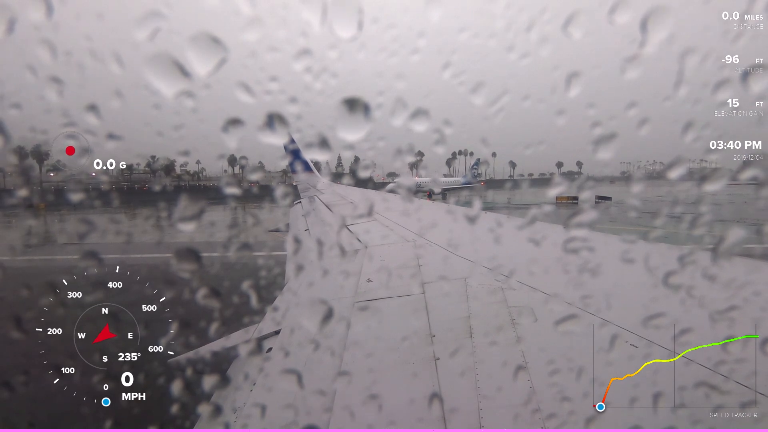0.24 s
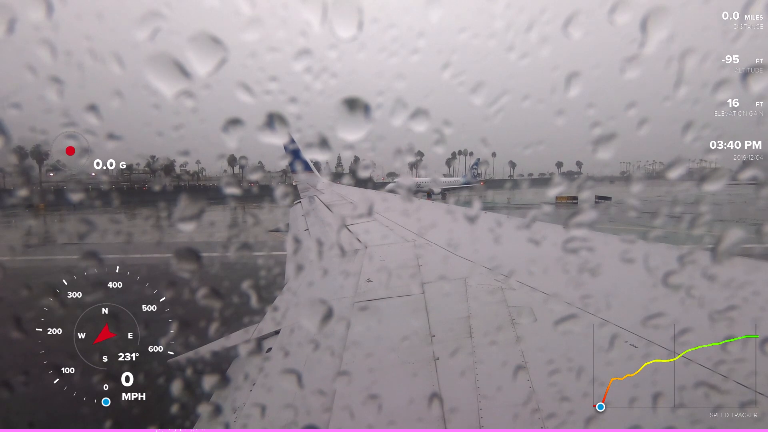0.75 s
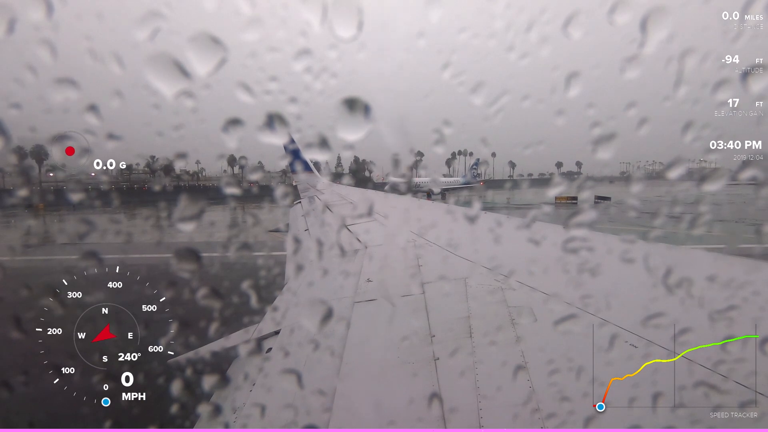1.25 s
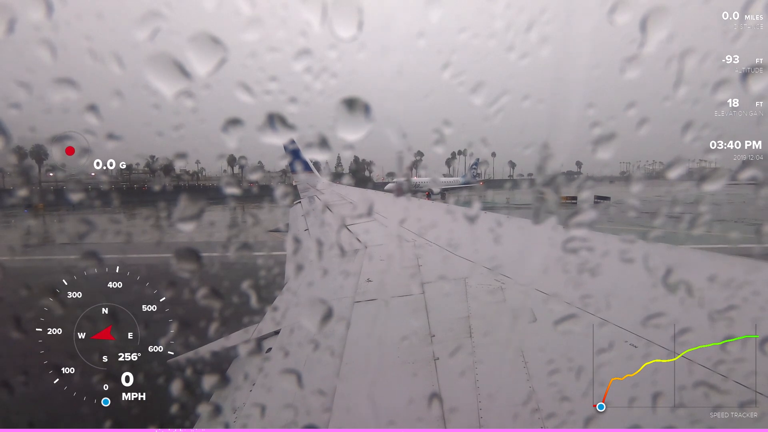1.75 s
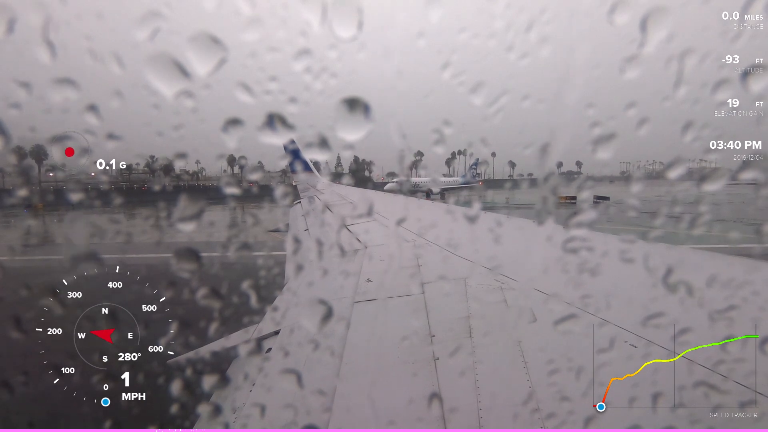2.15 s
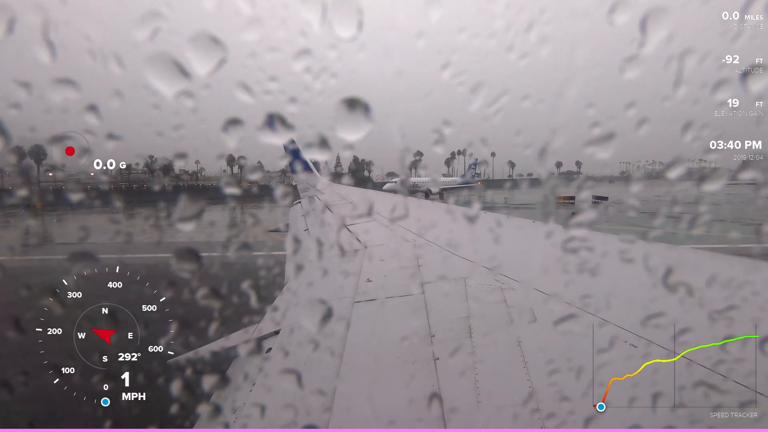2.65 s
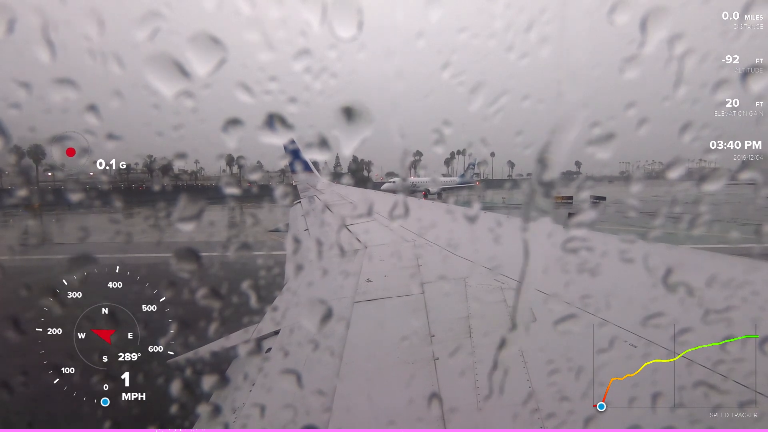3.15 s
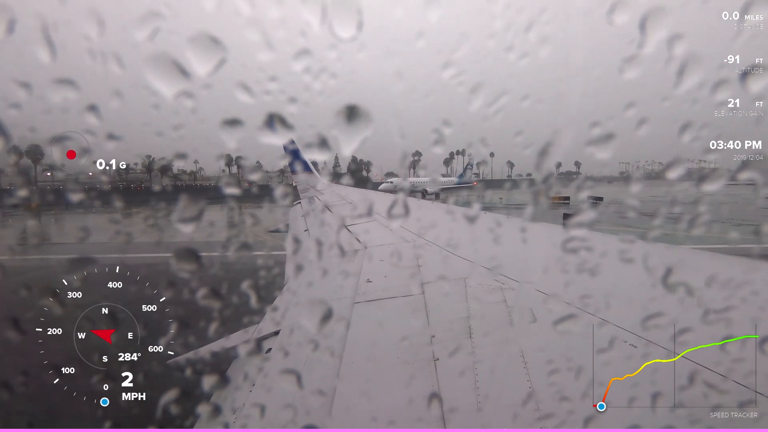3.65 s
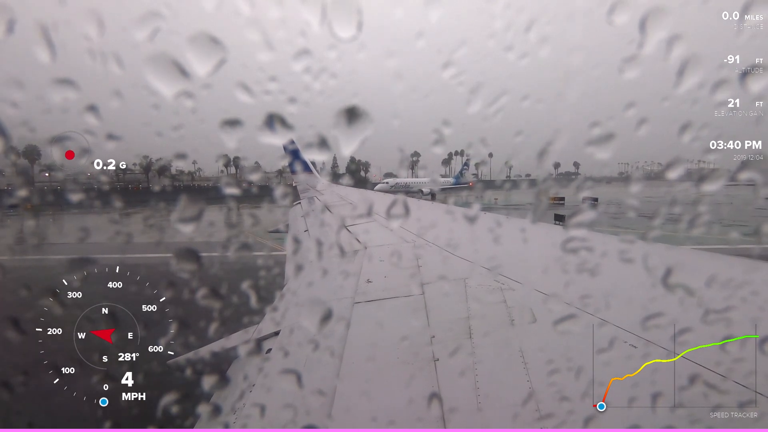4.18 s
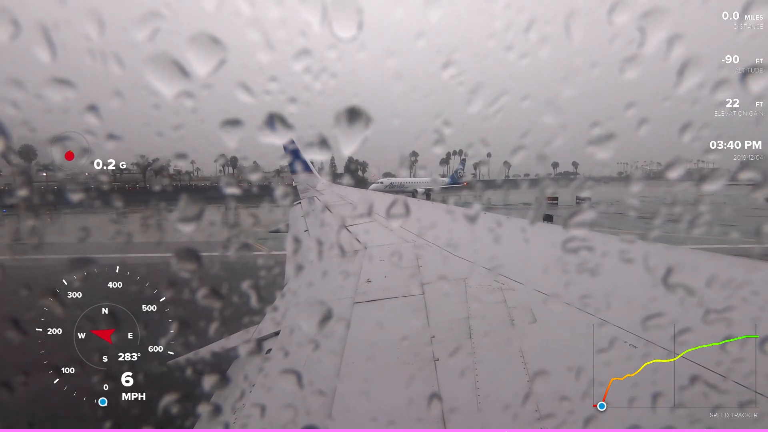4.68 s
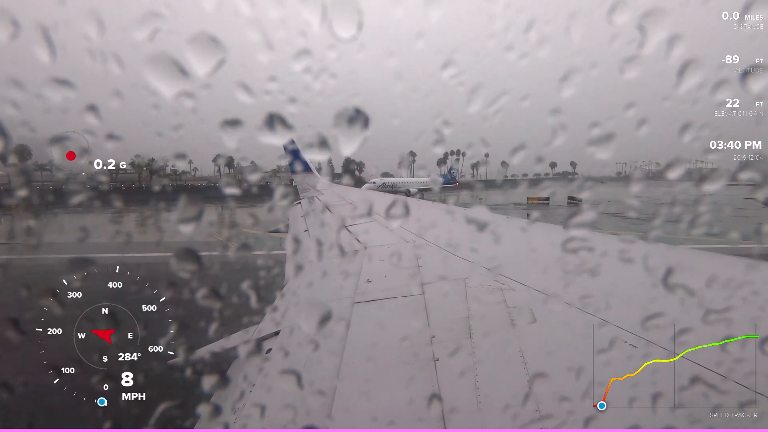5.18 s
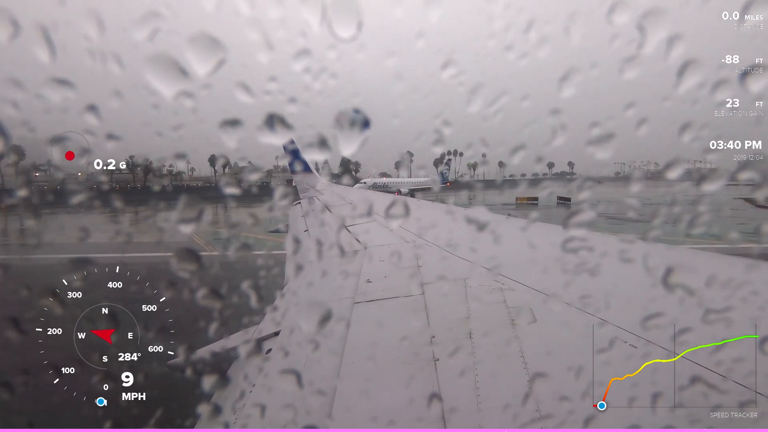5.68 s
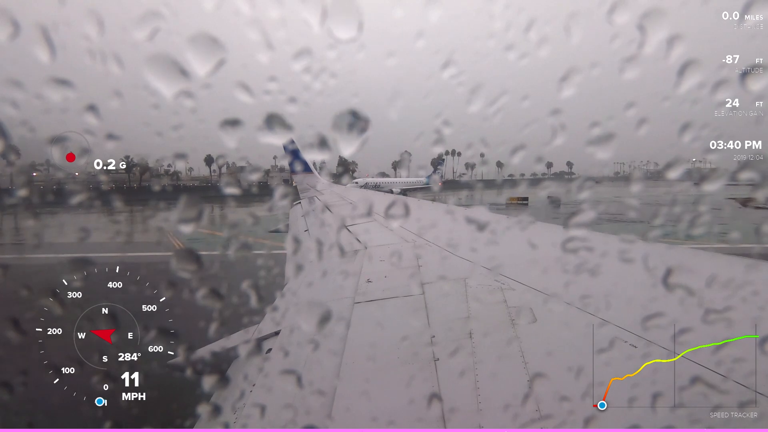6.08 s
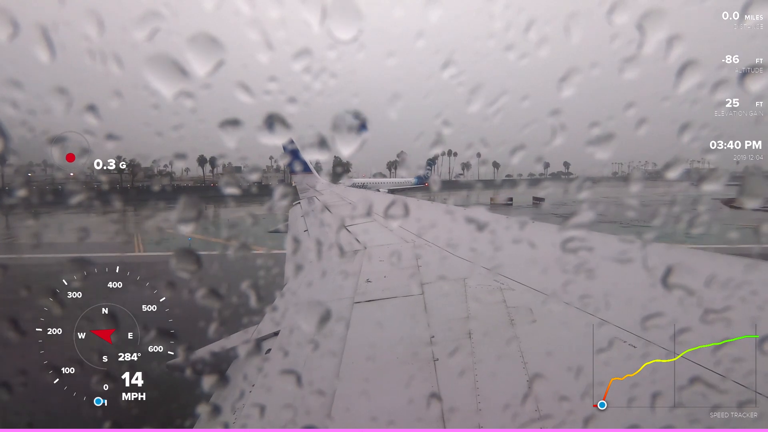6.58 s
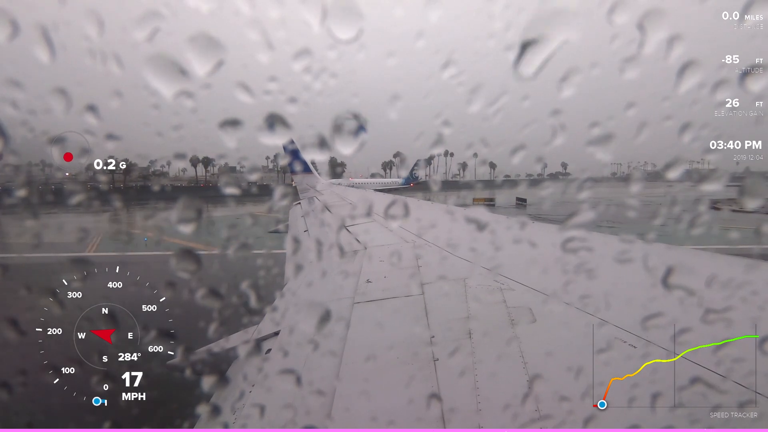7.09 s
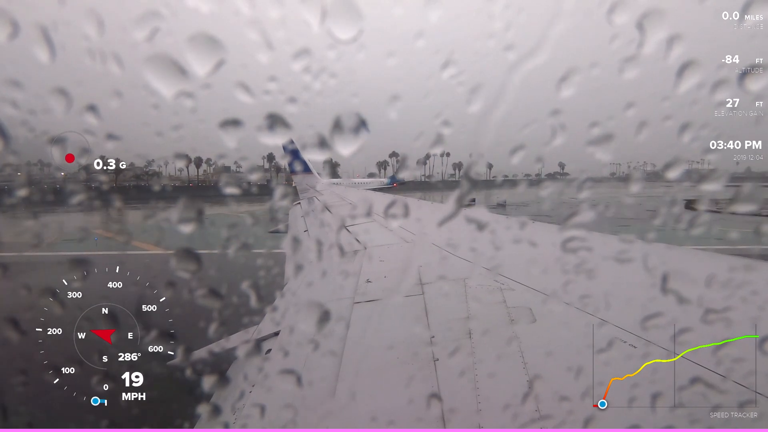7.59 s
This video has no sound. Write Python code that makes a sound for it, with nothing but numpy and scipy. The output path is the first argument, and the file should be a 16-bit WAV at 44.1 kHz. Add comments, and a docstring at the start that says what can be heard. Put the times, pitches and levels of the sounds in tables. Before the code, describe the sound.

Inside an airliner cabin, jet engines spool up from a low rumble to a heavy muffled roar with rising whine, while trim ticks and rattles.

```python
"""In the cabin of an airliner, at a window seat, the take-off run begins.
The fans' blade tones whine upward; exhaust roar and a rush of air are filtered turbulence that swells.
The fuselage is turbulence exciting two low resonances and a higher drone over a broad rumble.
Cabin air hisses, pump tones and a blower's wavering whistle sink away, and trim ticks are short noise
bursts. A seat fitting squeaks with a short tone of jittering pitch, then clicks and thumps as modes."""
import sys
import numpy as np
from scipy import signal
from scipy.fft import next_fast_len
from scipy.io import wavfile
from scipy.ndimage import uniform_filter1d, minimum_filter1d

SR = 44100
rng = np.random.default_rng(int(sys.argv[2]) if len(sys.argv) > 2 else 0)


def generate_wav(signal):
    """Clip the signal to [-1, 1] and save it as 16-bit WAV at the path in sys.argv[1]."""
    frames = np.transpose(np.atleast_2d(signal))
    scaled = np.clip(frames, -1, 1) * 32767
    pcm = np.round(scaled).astype(np.int16)
    wavfile.write(sys.argv[1], SR, pcm)


N = 345303
T = np.arange(N) / SR  # time, s

# Spectral densities of turbulence, each rescaled as a whole: frequency_hz, relative_level_db (per Hz)
RUMBLE_COLOUR = [(8, -21.5), (18, -8.5), (27, -3), (36, -4.5), (60, -3.5), (90, 0), (112, -0.5),
                 (137, -4.5), (155, -6), (182, -4), (210, -13.5), (300, -33)]
ROAR_COLOUR = [(150, -15.5), (215, 1), (290, -0.5), (328, -6), (352, -3.5), (375, -7.5), (402, -15),
               (435, -13), (485, -26), (520, -24.5), (560, -29), (700, -45.5)]
RUSH_COLOUR = [(300, -7.5), (500, 1), (680, 2), (760, -8), (880, -6), (1100, -19), (1700, -21.5),
               (2300, -22), (3000, -39)]
AIR_COLOUR = [(300, 6), (680, 13), (950, 3.5), (1150, -1.5), (1900, -0.5), (2450, -5), (2900, -9.5),
              (3700, -10), (4050, -14.5), (4900, -16.5), (5900, -29), (7900, -20), (9600, -31.5),
              (12500, -35), (15000, -49)]
# Bright snap of the plastic trim: frequency_hz, relative_level_db (per Hz)
SNAP_COLOUR = [(3000, -25), (5700, -14), (6900, -1), (8400, 0), (9300, -15), (12000, -24)]

# Upper hull boom: time_s, level_db
UPPER_BOOM = [(0, -29.5), (.3, -29), (1.05, -21.5), (1.5, -27.5), (2.25, -20.5), (3.3, -26), (4.1, -26.5),
              (4.75, -29), (5.2, -25.5), (6.4, -29.5), (7.1, -28), (7.83, -22)]
# Hull drone: time_s, level_db
DRONE = [(0, -34.5), (1.62, -42), (1.8, -26.5), (2.0, -39), (3.55, -38), (3.78, -28.5), (4.1, -33.5),
         (4.65, -34.5), (5.0, -26), (5.4, -31), (6.05, -31), (6.4, -26), (7.0, -25.5), (7.5, -36),
         (7.83, -27)]
# Broad rumble, which surges as full thrust arrives: time_s, level_db
RUMBLE = [(0, -27), (3.0, -27.5), (4.0, -23.5), (4.7, -22.5), (5.1, -20), (5.6, -21.5), (6.6, -22),
          (7.2, -22), (7.83, -20.5)]
# Lower hull boom: level at zero thrust (dB), rise per unit of thrust (dB)
LOWER_BOOM_DB, LOWER_BOOM_GROWTH_DB = -26, 1.7

# Thrust climbs steeply with fan speed, then levels off: blade_passing_hz, thrust_0_to_1
THRUST_LAW = [(1050, 0.09), (1295, 0.94), (1512, 0.95)]
# Exhaust roar: level at zero thrust (dB), rise per unit of thrust (dB)
ROAR_DB, ROAR_GROWTH_DB = -36, 7.5
# Rush of air and spray: level at rest (dB), start of the roll (s), growth (dB per s)
RUSH_DB, ROLL_S, RUSH_DB_PER_S = -59.5, 2.8, 1.94

# Fan spool-up: time_s, near_fan_blade_passing_hz
FAN_SPEED = [(0, 993), (1.6, 1008), (2.7, 1042), (3.5, 1103), (4.0, 1172), (4.6, 1243), (5.1, 1297),
             (5.5, 1339), (6.2, 1409), (7.0, 1467), (7.83, 1490)]
# Whine: time_s, near_fan_level_db, far_fan_level_db, far_fan_octave_level_db
WHINE = [(0, -78, -84, -88), (2.3, -75, -81, -83), (3.1, -72, -79, -83), (3.8, -68.5, -71, -84),
         (4.25, -70.5, -71.5, -85), (4.6, -64, -66.5, -85), (4.8, -71, -71, -78), (5.15, -66, -66.5, -74.5),
         (5.6, -68.5, -70, -75), (6.3, -66, -73, -86), (6.7, -68, -75, -87), (7.1, -73, -74.5, -87),
         (7.83, -71, -75, -82)]
FAR_FAN_RATIO = 0.981  # far fan's pitch relative to the near one

# Blower: pitch before switch-off (Hz), level (dB)
BLOWER_HZ, BLOWER_DB = 1850, -75.5
# Switch-off (s), time constant of coasting (s), fading while coasting (dB per s)
BLOWER_OFF_S, BLOWER_COAST_S, BLOWER_FADE_DB_PER_S = 3.9, 5.5, 4

# Cabin air hiss: time_s, level_db
AIR = [(0, -47.8), (.25, -48.3), (.45, -49.8), (.75, -50), (1.1, -52.2), (2.0, -52.8), (3.3, -53.1),
       (4.2, -52.2), (5.7, -54.3), (7.83, -55)]
# Thin pump tones: pitch_hz, width_hz, level_db (before the common gain below), steadiness_0_to_1
PUMP_TONES = [(895, 8, -64, .55), (1505, 26, -71.3, .4), (1860, 80, -76, .3), (2290, 50, -79, .3),
              (2430, 60, -77, .3), (3591, 8, -81, .7), (4490, 12, -92, .5)]
# Common gain of the pump tones: at the start (dB), fading (dB per s)
PUMP_GAIN_DB, PUMP_FADE_DB_PER_S = 3.5, 1.9

# Loudest trim ticks: start_s, level_db (before the rise), body_relative_to_snap_db, decay_s
TICKS = [(3.310, -69, 13, .007), (3.421, -78.5, 23, 0.028), (3.820, -75, 18, .022),
         (3.915, -75.5, 16, 0.046), (4.175, -71, 13.5, .013), (4.268, -65, 2, .004),
         (4.384, -65, 17.5, .008), (4.396, -71, 9, .005), (4.756, -71, 14, .009), (5.035, -60, -3, .0039),
         (5.069, -64, -4, .0043), (5.660, -65, -1, 0.004), (5.697, -63.5, 3, .0055),
         (5.807, -63.5, -2, .005), (5.843, -61, 0, .004), (5.879, -68, 0, .004), (6.015, -81, 23, .022),
         (6.278, -62, -9.5, .004), (7.203, -68, -4, .005), (7.244, -63, -13, .0039),
         (7.273, -71, 15, 0.013), (7.615, -63, -9, .0034), (7.738, -69, 9, .011)]
# Resonances of a trim panel: frequency_hz, width_hz, relative_level_db
PANEL_MODES = [(1760, 600, 2), (2480, 1000, -1), (3350, 900, -1.5), (4800, 1300, -10)]

# One short creak of a seat fitting: peak_time_s, pitch_hz, peak_db
CREAK = (4.9175, 1325, -41)
# Release click and landing thump of the fitting: start_s, gain_db, contact_softness_s
KNOCKS = [(4.9173, 0, .00002), (4.9204, 9, .0003)]
# Modes of the fitting: frequency_hz, level_db (before contact and rise), t60_s
FITTING_MODES = [(420, -43, .04), (680, -40, .025), (930, -47, .02), (1250, -43, .02), (2310, -43, .016),
                 (3200, -44, .012), (3780, -51, .01), (5330, -49, .009), (6500, -56, .008)]

TOP_HZ = 15400  # upper edge of the passband


def undb(db):
    """Logarithmic level: decibels to amplitude gain."""
    return 10 ** (np.asarray(db) / 20)


def unit(x):
    """Normalization: scale to rms 1."""
    return x / np.sqrt(np.mean(np.abs(x) ** 2))


def curves(table):
    """Linear interpolation: each column of a table with time first, sample by sample."""
    times, *columns = np.transpose(table)
    return [np.interp(T, times, column) for column in columns]


def noise(gain):
    """Spectral shaping: complex Gaussian noise weighted by gain(Hz); either part has about rms 1."""
    size = next_fast_len(N)
    hz = np.arange(1, size // 2) * SR / size
    draw = rng.standard_normal((len(hz), 2)) @ np.array([1, 1j])
    spectrum = np.append(0, draw * gain(hz))  # positive frequencies only
    return unit(np.fft.ifft(spectrum, size)[:N]) * np.sqrt(2)


def coloured(points):
    """Turbulence spectrum: noise with a given colour that falls away steeply above the last point."""
    points_hz, points_db = np.transpose(points)

    def gain(hz):
        colour_db = np.interp(np.log(hz), np.log(points_hz), points_db)
        return undb(colour_db) / (1 + (hz / points_hz[-1] / 2) ** 4)

    return noise(gain).real


def ringing(centre_hz, width_hz, steady=0):
    """Resonance under random excitation: narrow-band noise beats; steady 0-1 evens out its envelope."""
    z = noise(lambda hz: 1 / (1 + ((hz ** 2 - centre_hz ** 2) / (hz * width_hz)) ** 2))
    return unit(z.real / (np.abs(z) + 0.88) ** np.clip(steady, 0, 1))


def walk(rate_hz):
    """Low-pass random fluctuation: smooth chance with a spread of about 1."""
    return noise(lambda hz: np.exp(-(hz / rate_hz) ** 2)).real


def fuselage(thrust, surge_db=1.0, lower_surge_db=3.0, upper_surge_db=1.1, drone_surge_db=2.5):
    """Structural resonance: two low hull booms and a lumpy drone stand over broad-band rumble."""
    upper_db, = curves(UPPER_BOOM)
    drone_db, = curves(DRONE)
    rumble_db, = curves(RUMBLE)
    lower_db = LOWER_BOOM_DB + LOWER_BOOM_GROWTH_DB * thrust
    lower = ringing(48.2, width_hz=16, steady=0.31) * undb(lower_db + lower_surge_db * walk(11.0))
    upper = ringing(78.6, width_hz=8, steady=0.95) * undb(upper_db + upper_surge_db * walk(12))
    drone = ringing(158, width_hz=24, steady=0.57) * undb(drone_db + drone_surge_db * walk(7.6))
    rumble = coloured(RUMBLE_COLOUR) * undb(rumble_db + surge_db * walk(10))
    return lower + upper + drone + rumble


def exhaust(thrust, flutter_db=-0.2, swell_db=1.07):
    """Jet mixing noise: roar dulled by the cabin wall grows with thrust, a lighter rush with the run."""
    roar_db = ROAR_DB + ROAR_GROWTH_DB * thrust + flutter_db * walk(28) + swell_db * walk(1.1)
    roar = coloured(ROAR_COLOUR) * undb(roar_db)
    rush_db = RUSH_DB + RUSH_DB_PER_S * np.maximum(T - ROLL_S, 0)
    return roar + coloured(RUSH_COLOUR) * undb(rush_db)


def blade_tone(hz, waver=0.0028, clean=1.6):
    """Blade passing in uneven inflow: random pitch and complex-amplitude modulation of a tone."""
    phase = 2 * np.pi * np.cumsum(hz * (1 + waver * walk(16))) / SR
    inflow = clean + noise(lambda f: np.exp(-(f / 20) ** 2))
    return unit((inflow * np.exp(1j * phase)).real)


def fans(fan_hz):
    """Beating: two climbing blade tones of slightly different pitch, with the far fan's octave."""
    near_db, far_db, octave_db = curves(WHINE)
    far_hz = FAR_FAN_RATIO * fan_hz
    near = blade_tone(fan_hz) * undb(near_db)
    far = blade_tone(far_hz) * undb(far_db)
    octave = blade_tone(2 * far_hz) * undb(octave_db)
    return near + far + octave


def blower(unsteady=0.015):
    """Exponential run-down: a rough whistle holds its mean pitch, then sinks and fades."""
    late_s = np.maximum(T - BLOWER_OFF_S, 0)
    hz = BLOWER_HZ * np.exp(-late_s / BLOWER_COAST_S) * (1 + unsteady * walk(50))
    whistle = unit(np.sin(2 * np.pi * np.cumsum(hz) / SR))
    return whistle * undb(BLOWER_DB - BLOWER_FADE_DB_PER_S * late_s)


def cabin(flutter_db=1.0):
    """Flow noise and narrow-band tones: air conditioning hiss settles, thin pump tones sink away."""
    air_db, = curves(AIR)
    hiss = coloured(AIR_COLOUR) * undb(air_db + flutter_db * walk(21))
    tones = sum(undb(db) * ringing(hz, width, steady) for hz, width, db, steady in PUMP_TONES)
    return hiss + tones * undb(PUMP_GAIN_DB - PUMP_FADE_DB_PER_S * T)


def trim(rise_share=0.17, faint_decay_s=0.004, count=40):
    """Stick-slip friction: panels slip in gritty ticks, each a bright snap with a duller resonant body."""
    # The square root makes faint ticks more frequent as the run goes on.
    faint = [(T[-1] * np.sqrt(a), -79 + 8 * b, 10 * c - 3, faint_decay_s)
             for a, b, c in rng.random((count, 3))]
    snap, body = np.zeros((2, N))
    for start_s, db, body_db, decay_s in TICKS + faint:
        first = int(start_s * SR)
        span = slice(first, first + SR // 5)
        age = np.maximum(T[span] - start_s, 0)
        rise = 1 - np.exp(-age / (rise_share * decay_s))
        slip = undb(db) * rise * np.exp(-age / decay_s)
        snap[span] += slip
        body[span] += slip * undb(body_db)
    panel = unit(sum(undb(db) * ringing(hz, width) for hz, width, db in PANEL_MODES))
    return snap * coloured(SNAP_COLOUR) + body * panel


def creak(swell_s=0.0046, fade_s=0.011):
    """Frictional squeal: a slipping fitting gives a brief tone, scratchy from random pitch modulation."""
    peak_s, hz, db = CREAK
    envelope = np.exp(-np.maximum((peak_s - T) / swell_s, (T - peak_s) / fade_s))
    phase = 2 * np.pi * np.cumsum(hz * (1 + 0.053 * walk(530))) / SR
    return undb(db) * envelope * np.sin(phase)


def knocks(rise_s=0.00047):
    """Modal impact: the fitting clicks, then thumps; softer contact excites the high modes less."""
    out = np.zeros(N)
    for start_s, db, soft_s in KNOCKS:
        first = int(start_s * SR)
        span = slice(first, first + SR // 10)
        age = np.maximum(T[span] - start_s, 0)
        rise = 1 - np.exp(-age / rise_s)
        for hz, mode_db, t60_s in FITTING_MODES:
            push = undb(db + mode_db) / (1 + (np.pi * hz * soft_s) ** 4)
            decay = np.exp(-np.log(1000) * age / t60_s)
            out[span] += push * rise * decay * np.sin(2 * np.pi * hz * age)
    return out


def scene():
    """Superposition: all sources add at the seat; fan speed sets the thrust."""
    fan_hz, = curves(FAN_SPEED)
    thrust = np.interp(fan_hz, *np.transpose(THRUST_LAW))
    engines = fuselage(thrust) + exhaust(thrust) + fans(fan_hz)
    interior = blower() + cabin() + trim() + creak() + knocks()
    return (engines + interior)[None]


def record(dry, ceiling_db=-16, split_hz=250, hold_s=0.02):
    """Peak limiting and low-pass filtering: the camera holds down bass peaks and cuts the top."""
    bass = signal.sosfiltfilt(signal.butter(4, split_hz, fs=SR, output="sos"), dry)
    size = int(hold_s * SR)
    gain = np.minimum(1, undb(ceiling_db) / (np.abs(bass) + 1e-9))
    gain = minimum_filter1d(gain, size)
    gain = uniform_filter1d(uniform_filter1d(gain, size // 2), size // 2)
    limited = dry - bass + undb(0.99) * gain * bass  # the bass is lifted by 0.99 dB
    edges = np.minimum(1, np.minimum(T, T[-1] - T) / 0.003)  # 3 ms fades at both ends
    low_pass = signal.ellip(8, 0.2, 70, TOP_HZ, fs=SR, output="sos")
    return signal.sosfilt(low_pass, limited * edges)


dry = scene()
out = record(dry)
generate_wav(out)
```